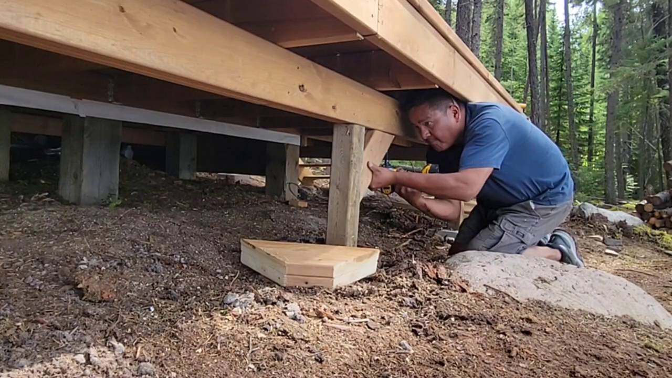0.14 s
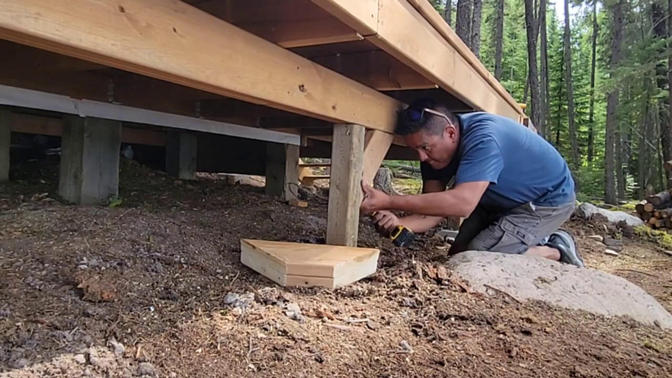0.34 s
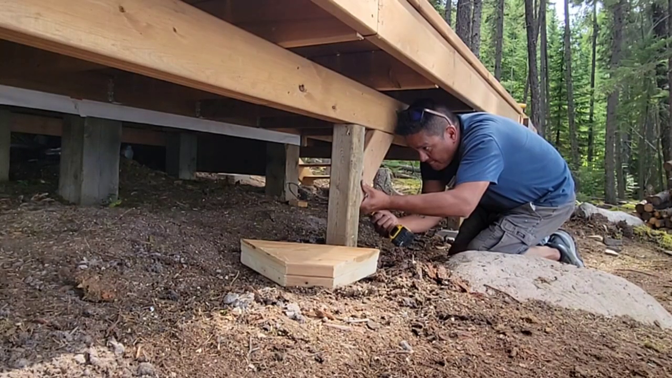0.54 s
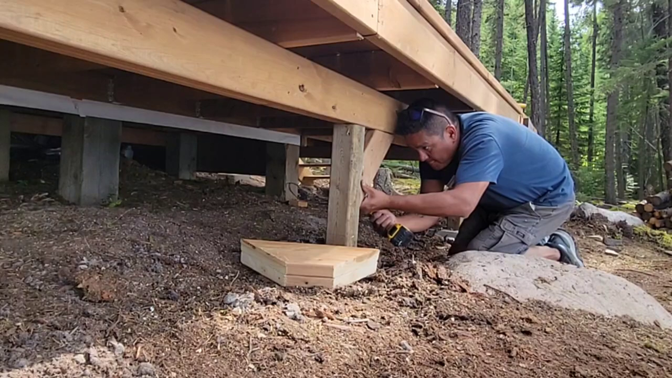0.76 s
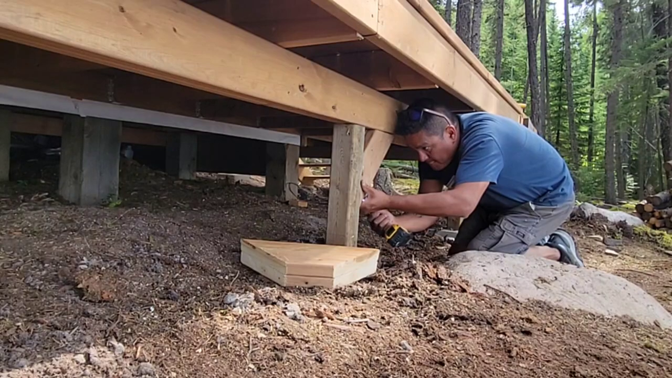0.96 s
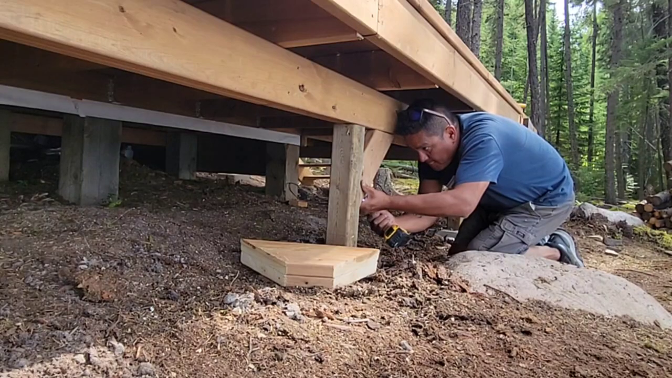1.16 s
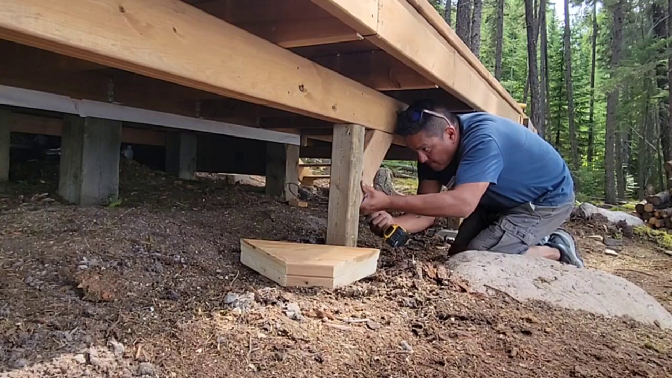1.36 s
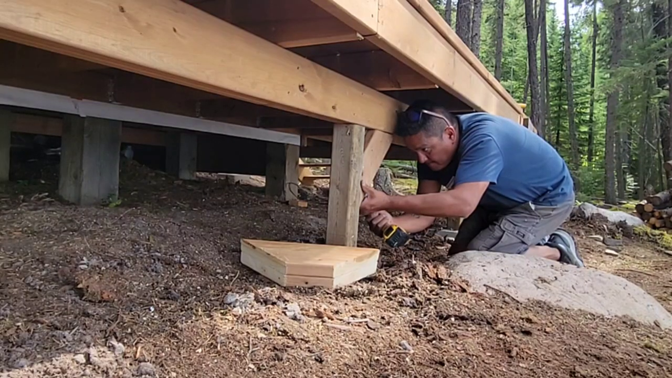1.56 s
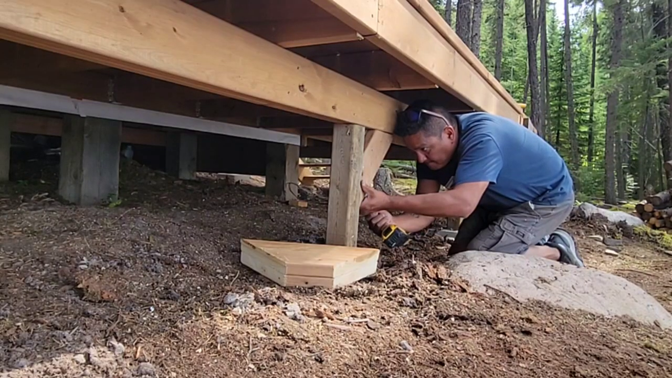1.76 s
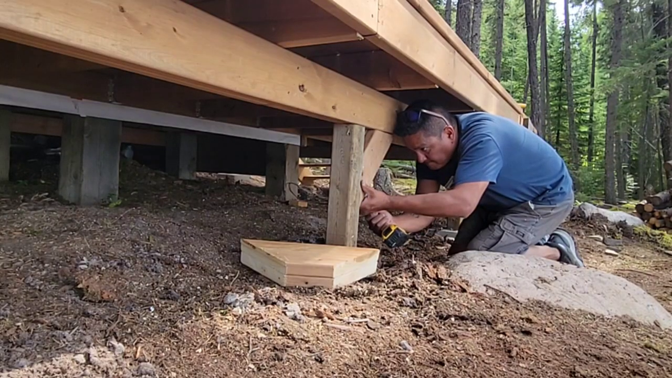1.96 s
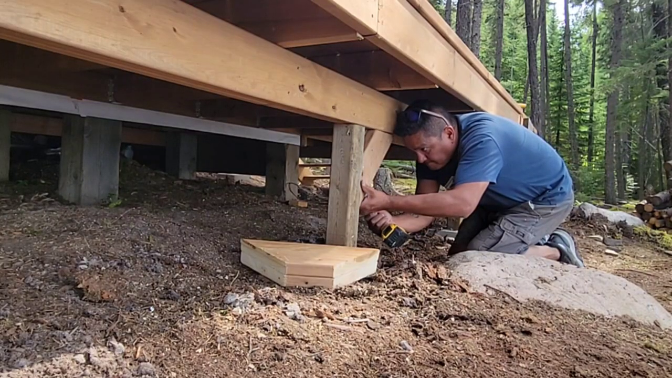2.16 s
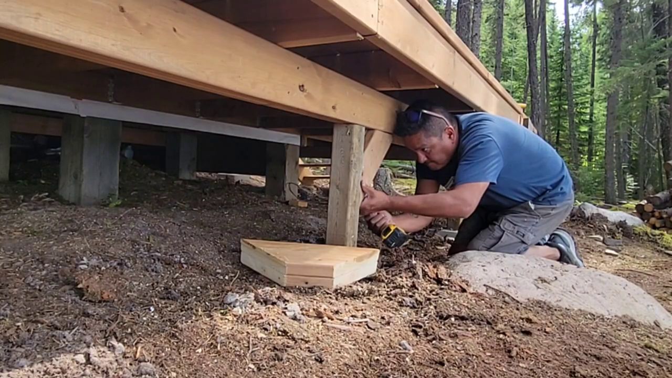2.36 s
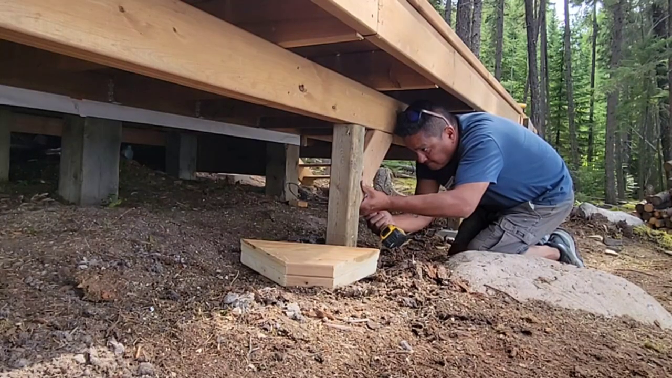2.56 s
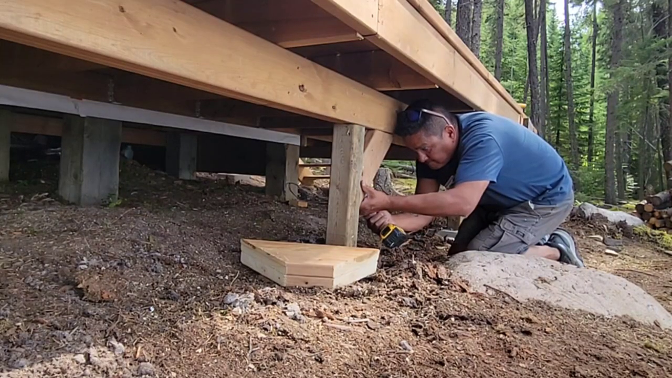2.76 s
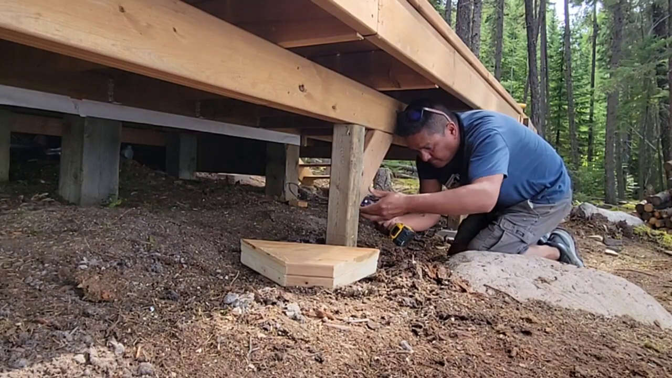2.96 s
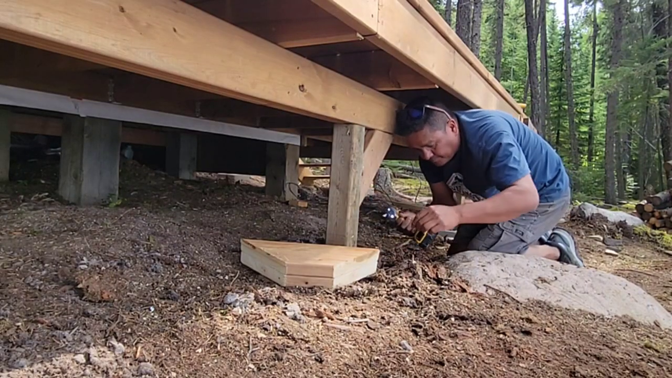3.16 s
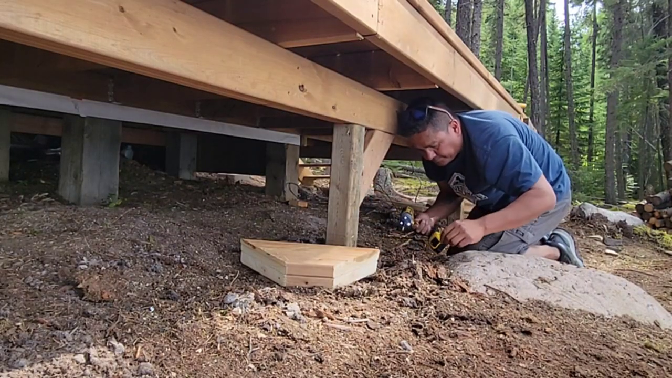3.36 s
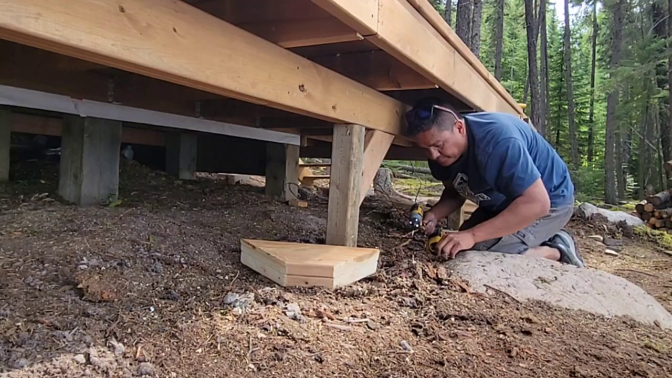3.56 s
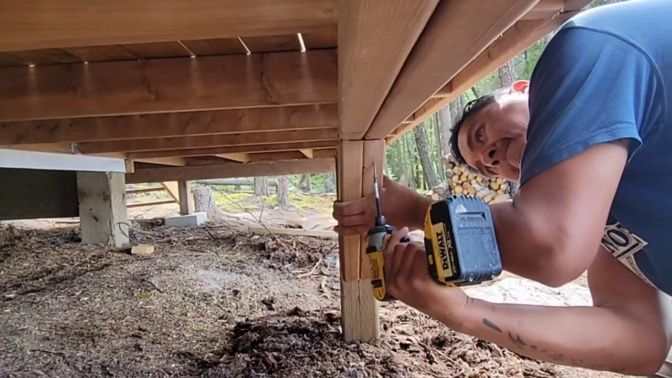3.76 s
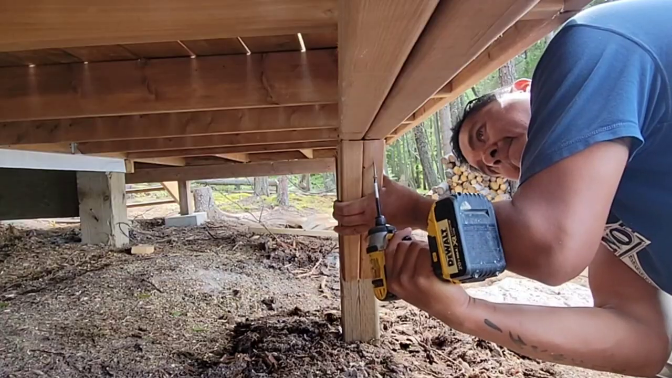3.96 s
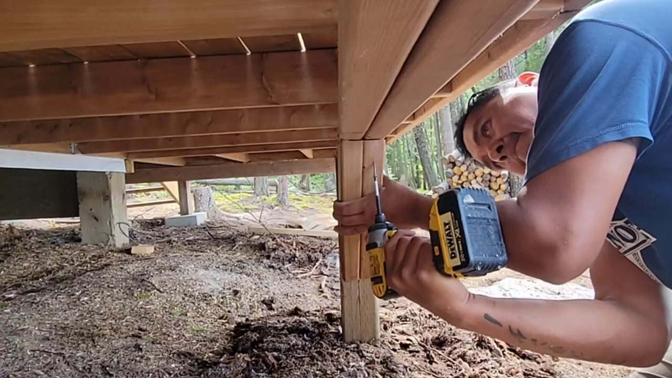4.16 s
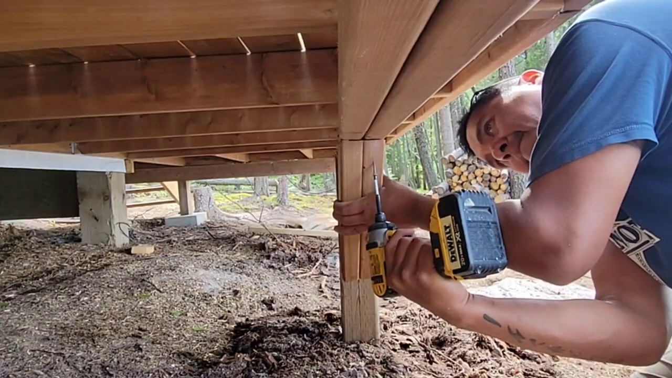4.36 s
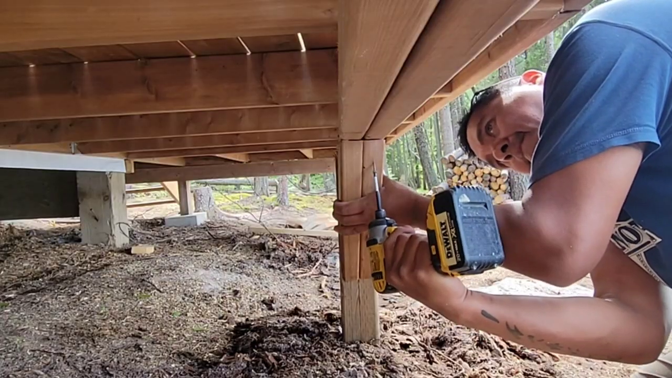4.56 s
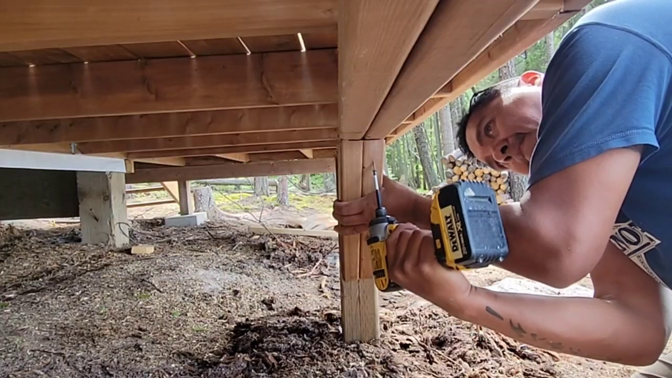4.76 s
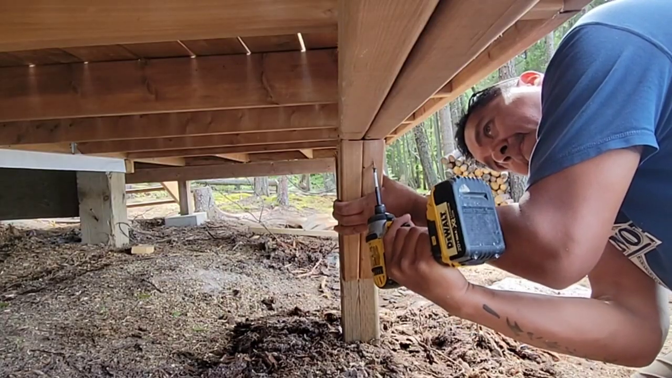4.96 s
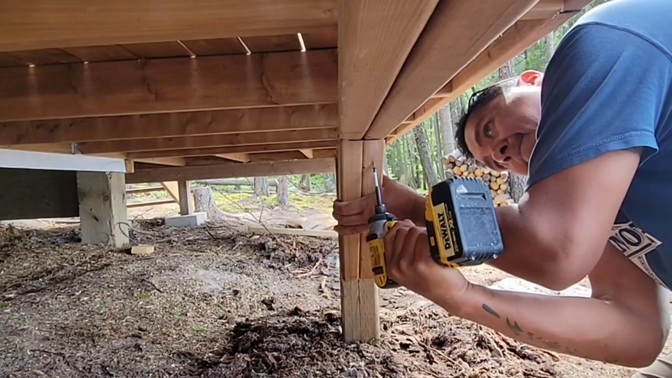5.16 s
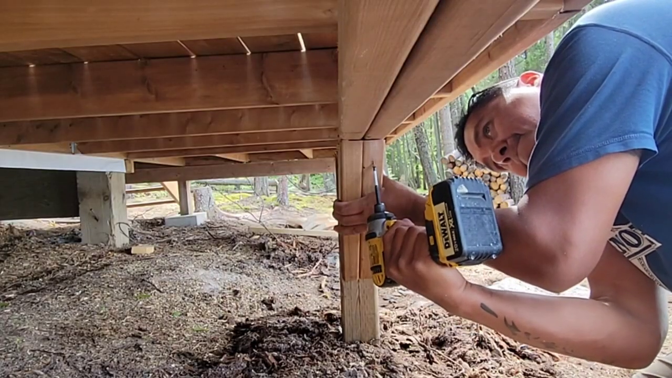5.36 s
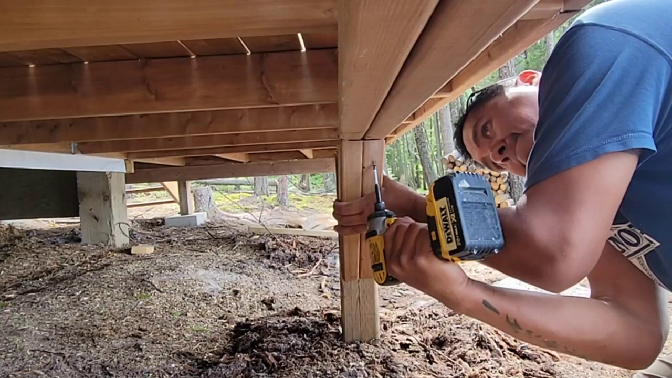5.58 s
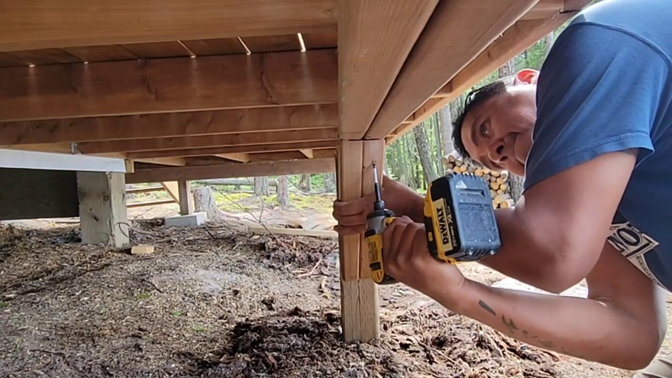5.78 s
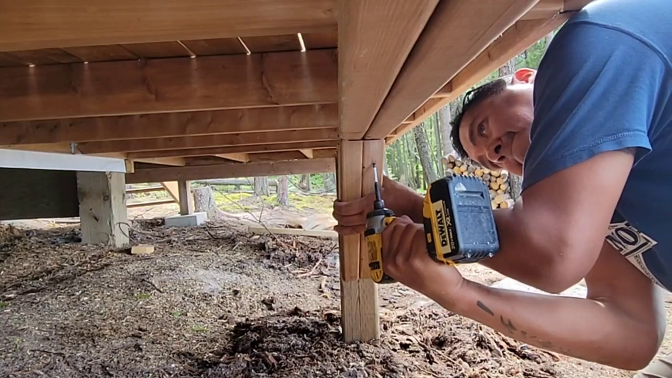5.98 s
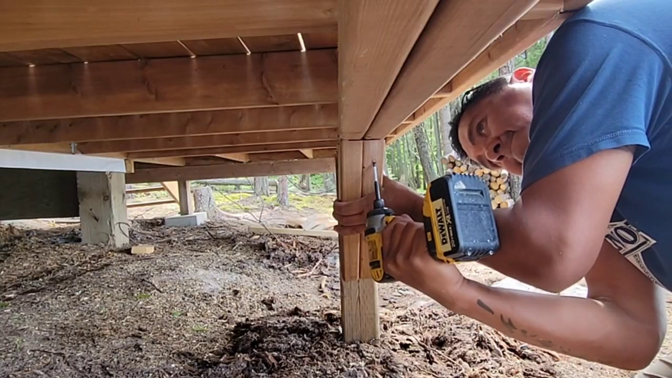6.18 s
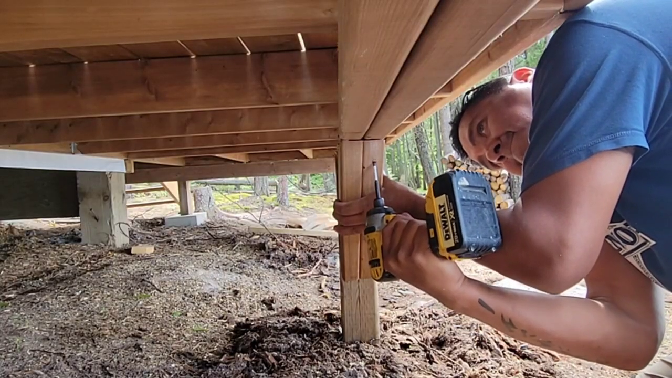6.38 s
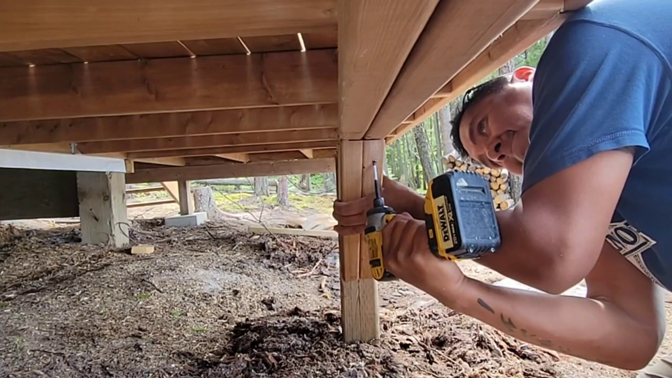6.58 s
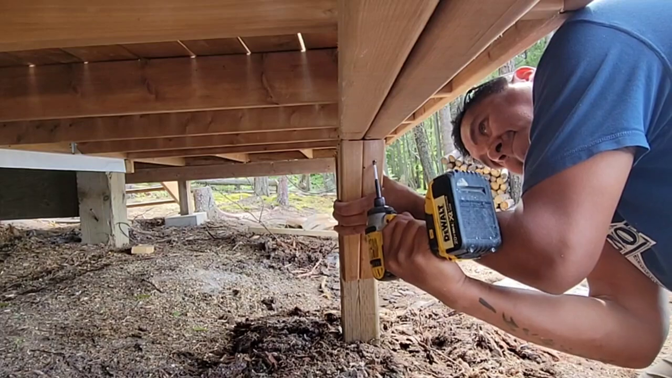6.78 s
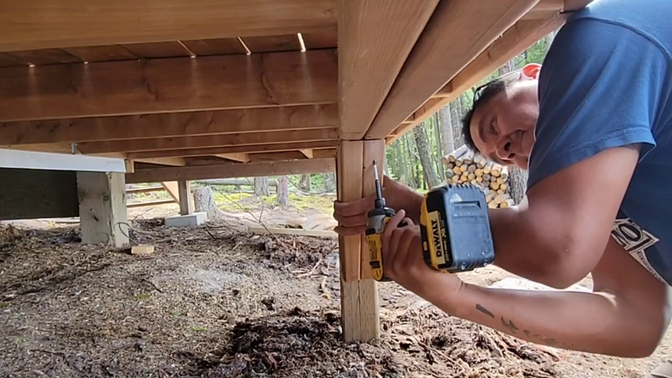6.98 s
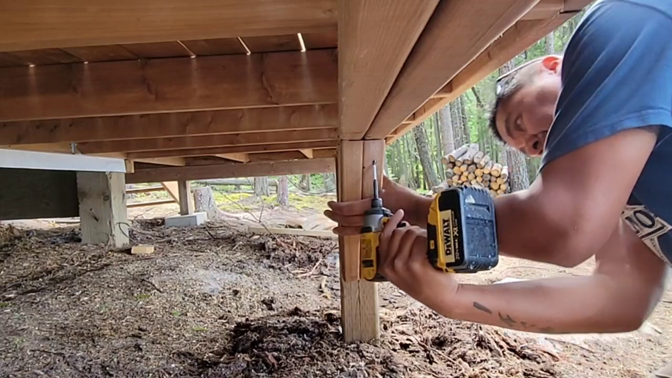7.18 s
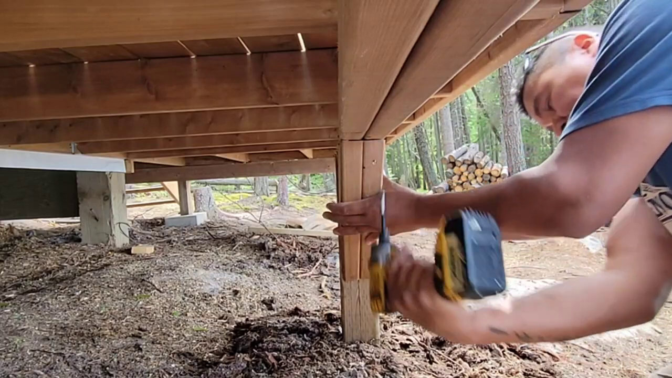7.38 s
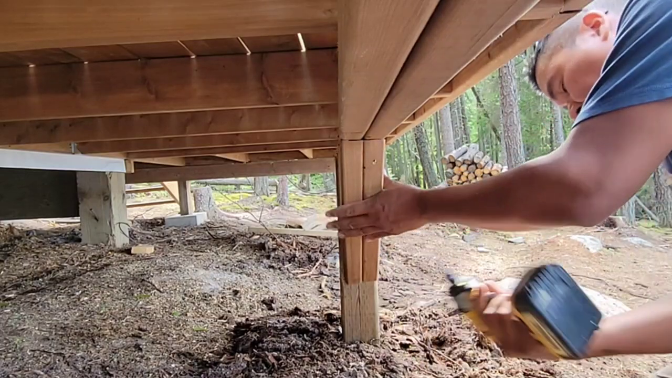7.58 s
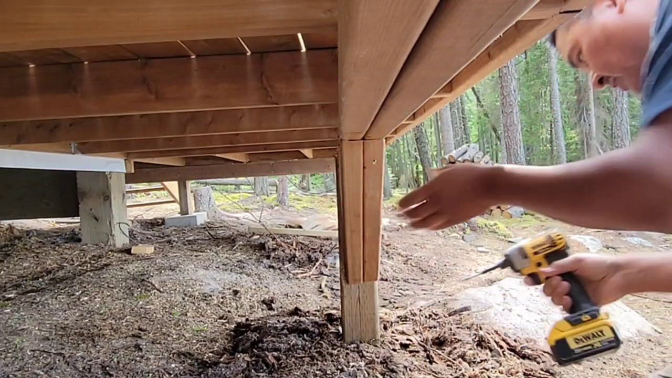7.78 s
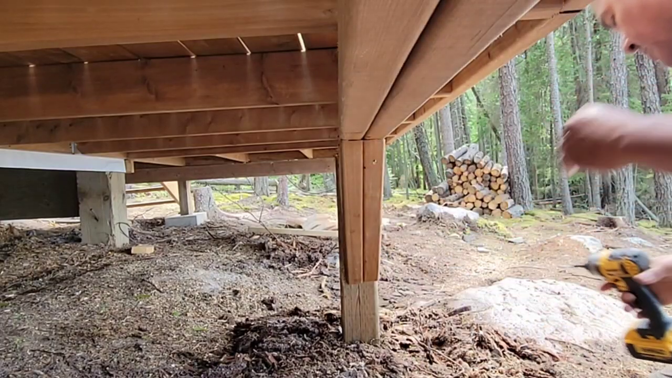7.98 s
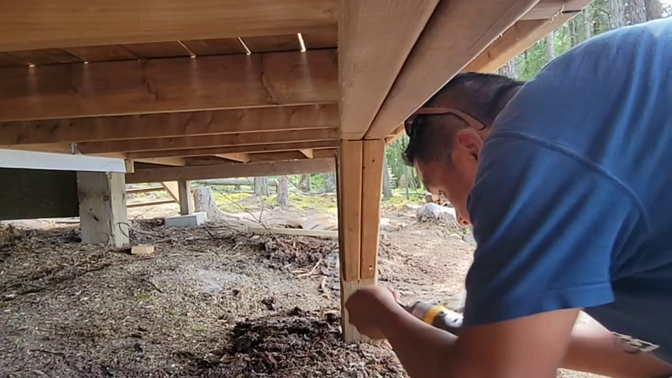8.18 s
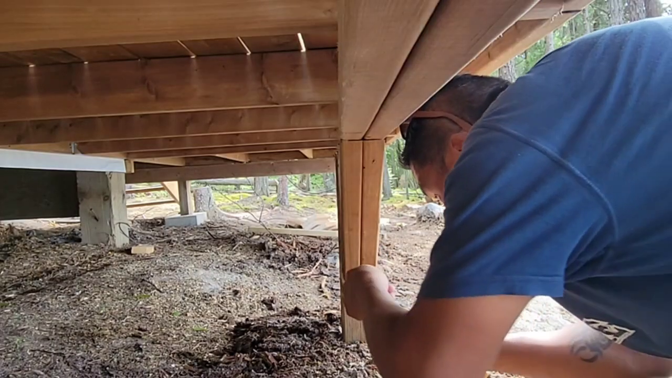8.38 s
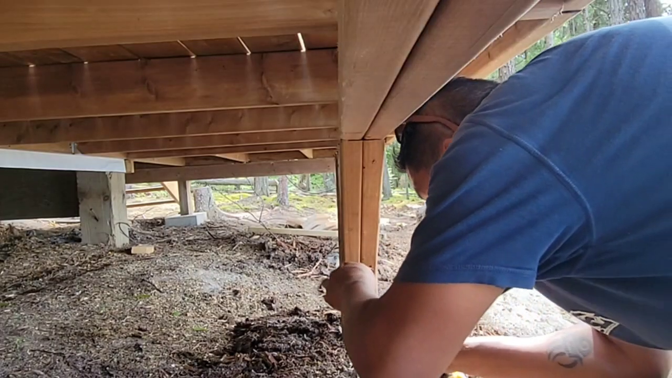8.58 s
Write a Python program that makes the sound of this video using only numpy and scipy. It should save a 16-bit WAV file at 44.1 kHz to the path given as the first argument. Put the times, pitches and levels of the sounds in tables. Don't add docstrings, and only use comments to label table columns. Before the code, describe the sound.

Outdoors beneath a wooden deck among trees, an impact driver bumps a post, spins up with a gear whine and a high screw squeal, then hammers rapidly for over a second and a half. Closer to the microphone come knocks, short trigger pulls and a second hammering burst that rings out in the timber. Soft shuffling on soil follows, over a faint distant generator drone.

```python
import sys
import numpy as np
from scipy import signal
from scipy.fft import rfft, irfft, next_fast_len
from scipy.io import wavfile
from scipy.ndimage import uniform_filter1d

SR = 44100
rng = np.random.default_rng(int(sys.argv[2]) if len(sys.argv) > 2 else 0)


def field_ratio(decibels):
    return 10 ** (np.asarray(decibels, dtype=float) / 20)


def to_wav(sig):
    pcm = np.clip(np.atleast_2d(sig), -1, 1) * 32767
    pcm = np.round(pcm).astype(np.int16)
    wavfile.write(sys.argv[1], SR, pcm.T)


N = 380583
T = np.arange(N) / SR

CHANGES_S = [
    3.665,
    8.03,
]

# time_s, blows_so_far
BLOW_COUNTS = [
    [(1.2626, 0), (2.1355, 34), (2.2606, 39), (2.358, 43), (2.793, 61), (2.8187, 62), (2.8522, 63),
     (2.8882, 64)],
    [(5.169, 0), (5.2058, 1), (5.327, 5), (5.4702, 10), (5.7629, 20), (6.043, 30), (6.4538, 45),
     (6.8549, 60), (6.885, 61)],
]
# time_s, effort_db, seated_0_to_1
EFFORT = [
    [(1.25, -5.5, 0), (1.264, 2.5, 0.06), (1.31, -1, 0), (2.17, -0.5, 0.1), (2.3, -2, 0.94), (2.79, 0, 0.7),
     (2.85, -5, .95), (2.9, -9, .95), (2.97, -13.5, .95)],
    [(5.14, -15, 0), (5.172, 0.5, 0.2), (5.23, 0, 0.11), (5.45, -1, 1), (6.15, -1.5, 0.9),
     (6.75, -1.5, 0.9), (6.83, 0, 0), (6.88, -10, 0.9), (6.99, -9.5, 0.8)],
]
# offset_ms, level_db, decay_ms
CONTACTS = [
    [(-6, -7.5, 2.2), (-0.79, -1.5, 3.2), (7, -9.5, 2), (14.5, -9, 3)],
    [(-8, -6.5, 6.4), (-3.5, -6, 0.85), (-2, -1.5, 4.4), (-1.5, -38, 3.7)],
]
# mode_hz, width_hz, level_db
BOOM_TIGHT = [
    [(152.5, 8.3, 0.5), (270, 46, -18), (394, 29, -4.5), (472.4, 26, -10.5), (550, 41, -6.5)],
    [(253.7, 14, 6), (310, 35, -18), (376.6, 21, -9.5), (460, 30, -1), (527, 18, -4), (569, 35, -26)],
]
# mode_hz, width_hz, level_db
BOOM_LOOSE = [
    [(157.5, 6.2, -1), (276, 42, -4.5), (395, 23, -7.5), (464, 31, -9.5), (554, 29, -7.5)],
    [(239.2, 7.7, 3.5), (312, 52, 0), (400, 41, -2), (500, 68, -3.5), (566, 20, -4.5)],
]
LOOSE_DB = [-0.5, -1]
# from_s, to_s
TIGHTENS_S = [(2.15, 2.3), (5.45, 5.9)]
# mode_hz, width_hz, level_db
KNOCK_FREE = [
    [(699, 24, -15.5), (819, 16, -3), (968.7, 16, 2), (1136, 18, 3.5), (1420, 40, -5), (1640, 260, 1.5)],
    [(773, 18.1, 2.5), (995, 41, 3), (1074, 19, 2.5), (1445, 36, 1), (2030, 90, -27)],
]
# mode_hz, width_hz, level_db
KNOCK_CLAMPED = [
    [(700, 12, -5), (886, 50, -3), (963, 75, 1), (1165, 80, 2), (1420, 35, -1), (1640, 240, 1.5)],
    [(748, 16, 2), (1010, 35, -2.5), (1083, 30, -1.5), (1457, 55, 5.5), (2020, 99, -28.5)],
]
# mode_hz, width_hz, level_db
JOIST = [
    [(207.3, 5.6, -4), (77.5, 39, -7)],
    [(111, 13, -6), (76.5, 49, -4.5), (147, 24, -4)],
]
# freq_hz, level_db_per_hz
RATTLE = [
    [(24, -71.5), (40, -37), (110, -17.5), (156, -8), (246, -10), (381, -7.5), (739, -15), (1140, -10),
     (1320, -13.5), (1460, -5.5), (2600, -30.5), (3380, -56), (5720, -120)],
    [(24, -61.5), (40, -33.5), (103, -15), (193, -14), (250, -10.5), (300, -7.5), (540, -10.5),
     (865, -23.5), (1070, -10), (1320, -26), (2600, -28), (3380, -63.5), (5720, -120)],
]
# freq_hz, level_db_per_hz
STEEL = [
    [(1060, -22), (1800, -8), (2400, -5.5), (3350, -2), (3680, -7), (4380, -9.5), (5530, -8.5), (6180, -10),
     (7300, -7.5), (9370, -13), (13300, -9.5), (16000, -21), (16500, -46.5)],
    [(1060, -37.5), (1800, -6.5), (1960, -5), (2360, -5), (3350, 1), (4150, -10), (5530, -6), (6780, -10),
     (7370, -5.5), (8950, -13.5), (13100, -9.5), (15800, -14), (16500, -50.5)],
]
# mode_hz, width_hz, level_db, seated_gain_db
ANVIL = [(5460, 1200, -34.5, 5.5), (7260, 527, -40, 1)]
# mode_hz, width_hz, level_db
SNAP = [
    [(1634, 400, 3), (2090, 51, -10.5), (2870, 340, -6), (5500, 1200, -2.5)],
    [(1880, 470, -3), (3080, 410, -2), (7430, 1500, 1), (11000, 4400, -3)],
]
SNAP_DB = [-25.5, -29]
# boom_db, knock_db, steel_db, joist_db
LAYER_DB = [(-18, -15.5, -23.5, -36), (-21.5, -25.5, -23.5, -27.5)]
# boom_db, knock_db, steel_db, joist_db
SEATED_DB = [(-0.5, -.7, 0.93, 10), (5.5, -0.87, 0.25, 3)]
DIE_DB_PER_S = [(161, 440, 880, 210), (170, 670, 700, 123)]
LAST_BLOWS_DB = [-3, -1]
RAP_SCATTER_DB = [1, 2.5]
RAP_SPREAD_S = [.005, .009]
DECK_SPREAD_S = [.003, .007]
PUSH_SPREAD_S = [.0067, .0067]
RATTLE_SPREAD_S = [.007, .012]

# time_s, mesh_hz, level_db, clear_tone_db
FREE_RUN = [(0.28, 460, -63, 2), (0.39, 740, -51, -6), (0.455, 984, -50, 3), (0.65, 1110, -45.5, 4.5),
            (0.722, 1349, -43, -3.5), (0.82, 1419, -43.5, -6), (0.94, 1325, -45, -6.5),
            (0.975, 1153, -39, 6), (1.07, 860, -64.5, -4.5)]
# start_s, let_go_s, coast_s, top_mesh_hz, level_db
PULLS = [
    (1.065, 1.25, 0.019, 1220, -43),
    (4.067, 4.155, 0.12, 995, -36.5),
    (4.381, 4.565, .095, 1111, -35),
    (4.746, 4.879, 0.082, 969, -35.5),
    (5.123, 5.17, 0.011, 1269, -37),
]
CLEAR_DB = [5, 4, -3, -15, 5]
DWELL_S = [0.025, .018, .028, 0.0012, 0.005]
# first_db, second_db
MESH_DB = [(5.6, 2), (1.1, 9.2)]
UPPER_DB = [0, 0, 0, -1, -2.5, 0]
# freq_hz, level_db_per_hz
WHIRR = [(24, -48), (40, -10.5), (79, -2), (172, -25), (228, -4), (865, -14.5), (1060, -4.5), (1290, -13.5),
         (2090, -13.5), (2430, -13.5), (3130, -11), (13200, -29), (15300, -30.5), (16500, -65)]
# mode_hz, width_hz, level_db
HOUSING = (3500, 130, 2.9)
# start_s, length_s, level_db
TRIGGER = [
    (1.065, .05, -59.5),
    (4.062, .05, -48),
    (4.393, .025, -49),
    (5.112, .02, -59),
]

# time_s, pitch_hz, first_db, overtones_db
SQUEAL = [
    [(.568, 4350, -46, -65), (.58, 4340, -37.5, -65), (.592, 4150, -37.5, -60), (.599, 3930, -26, -44),
     (.624, 3914, -17.5, -41), (.648, 3700, -25.5, -36), (.667, 3500, -32, -39)],
    [(.666, 3820, -21.5, -39.5), (.676, 3780, -16.5, -37.5), (.702, 3920, -21.5, -38),
     (.73, 3890, -17.5, -35), (.76, 3834, -17.5, -34.5), (.776, 3570, -22, -36), (.788, 3520, -29.5, -41)],
    [(.786, 3804, -25.5, -32), (.816, 3640, -25.5, -38), (.824, 3460, -26, -36.5), (.848, 3430, -25, -31.5),
     (.857, 3300, -28.5, -41), (.867, 3210, -26, -35), (.877, 3286, -31.5, -41)],
    [(.876, 3360, -25.5, -40), (.883, 3370, -21.5, -35.5), (.891, 3390, -29, -37), (.932, 3504, -17, -33.5),
     (.972, 3220, -21, -40), (.98, 3022, -26, -44.5), (.993, 2970, -22, -46), (1.006, 2900, -41, -58.5)],
    [(.998, 2320, -32, -58.5), (1.014, 1654, -21, -59), (1.024, 1446, -29.5, -62.5),
     (1.036, 1295, -50, -68)],
]

# start_s, thud_db, thud_hz, brightness_db
FAR_KNOCKS = [(0.002, -21.5, 212, -32), (0.013, -20.5, 200, -27), (0.041, -15, 930, -8),
              (0.057, -15.5, 255, -12.5), (0.081, -22, 756, -14), (0.105, -18, 260, -17.5),
              (0.03, -13.5, 700, -3.5), (0.07, -15, 219, -0.5), (0.096, -16.5, 247, -2.5),
              (0.115, -25, 256, -6.5), (0.204, -34.5, 220, -20.5), (0.271, -43, 122, -14),
              (1.125, -23, 295, -7), (1.139, -19.5, 394, -0.5), (1.187, -22, 144, -24)]
# start_s, thud_db, thud_hz, brightness_db
NEAR_KNOCKS = [(3.695, -41, 132, -7.5), (3.704, -28, 400, -6), (3.711, -17, 243, -26.5),
               (3.775, -25, 140, -17), (3.798, -37, 330, -12), (3.909, -45, 417, -19),
               (3.935, -38, 380, -14), (4.118, -11, 112, -31.5), (4.118, -6.5, 455, -20),
               (4.135, -17, 364, 3.5), (4.149, -15.5, 256, -15.5), (4.299, -26.5, 256, -11),
               (4.415, -24.5, 233, 4.5), (4.438, -21, 430, -13), (4.702, -13.5, 260, -26),
               (4.758, -27.5, 224, -14), (4.777, -15, 513, -1), (4.788, -20.5, 245, -13.5),
               (4.871, -11, 234, -13.5), (4.875, -9, 535, 0), (4.886, -9, 350, -7), (4.912, -12, 546, -8.5),
               (4.921, -8.5, 295, -4.5), (4.931, -12.5, 500, -20.5), (5.056, -29, 132, -13),
               (5.116, -31, 116, -5.5), (5.129, -20.5, 255, 0), (5.156, -12, 400, -7),
               (5.159, -22, 196, -11)]
# start_s, thud_db, brightness_db
SHUFFLES = [(7.299, -36.5, -12.5), (7.319, -39, -21), (7.343, -52, -6.5), (7.37, -43.5, -8.5),
            (7.384, -49, -16.5), (7.487, -50, -18.5), (7.6, -51, -21), (7.679, -57, -17.5),
            (7.779, -65, -14), (8.034, -43.5, -14.5), (8.093, -54.5, -5), (8.191, -53.5, -9.5)]
# hollow_over_click_db, t60_s, hollow_hz
KNOCK_KINDS = [(16, 0.1, 800), (8.5, 0.06, 1400), (17, 0.072, 990)]
# start_s, length_s, level_db, centre_hz
RUSTLES = [(1.129, 0.028, -19.5, 1230), (7.291, .03, -63, 11000), (8.026, 0.032, -67, 9050),
           (3.683, 0.13, -73, 2210), (3.895, .06, -74, 2200), (4.669, 0.033, -40.5, 1460),
           (4.952, 0.14, -41, 400), (5.017, 0.05, -52, 2200), (4.688, 0.011, -46.5, 5000),
           (7.229, 0.11, -63, 477), (7.288, .14, -74.5, 2164), (7.595, 0.067, -69, 420),
           (7.619, .22, -80.5, 3250), (8.071, 0.2, -73.5, 2510), (8.361, .08, -76, 700)]
# mode_hz, width_hz, level_db, t60_s
RING_OUT = [
    (110, 43, -31.5, 0.55),
    (255, 50, -28.5, .28),
    (450, 220, -38, 0.18),
    (1050, 500, -45.5, 0.16),
]

# multiple, level_db
GENERATOR = [
    [(1, -25.5), (2, -18.5), (3, -4), (4, 0), (5, -6), (6, 1.5), (7, -24), (8, -30.5), (9, -22.5),
     (10, -26)],
    [(1, -4.5), (2, 3), (3, -4.5), (4, 1.5), (5, -9.5), (6, -9.5), (7, -5.5), (8, -11), (9, -23.5),
     (10, -18)],
    [(1, -10), (2, 1), (3, -4.5), (4, 0.5), (5, -9), (6, -17.5), (7, -8), (8, -28), (9, -43), (10, -22.5)],
]
GENERATOR_DB = [-47, -47, -45]
# freq_hz, level_db_per_hz
FOREST = [(15, -37), (25, 0), (65, -15), (118, -7), (202, -10), (399, -29), (600, -31), (687, -43),
          (902, -31), (1010, -35.5), (2900, -37), (5720, -50.5), (7920, -47), (15200, -61.5), (16500, -77)]
FOREST_DB = [-49.5, -55, -56.5]
# freq_hz, side_minus_mid_db
WIDTH = [(60, -18), (110, -14.5), (200, -13), (380, -11.5), (700, -6.5), (1290, -6), (2380, -4), (4400, -1),
         (8120, -1), (15000, 0.5)]


def unit(x):
    return x / np.sqrt(np.mean(x ** 2) + 1e-30)


def colour(x, points):
    size = next_fast_len(len(x))
    hz, db = np.transpose(points)
    bins_hz = np.arange(size // 2 + 1) * SR / size
    gain = field_ratio(np.interp(np.log(bins_hz + 1), np.log(hz), db))
    return irfft(rfft(x, size) * gain, size)[:len(x)]


def butter(x, edge_hz, kind="low"):
    return signal.sosfilt(signal.butter(2, edge_hz, kind, fs=SR, output="sos"), x)


def ring(x, hz, width_hz):
    return signal.lfilter(*signal.iirpeak(hz, hz / width_hz, SR), x)


def modes(drive, table, flip=-1):
    return unit(sum(flip ** j * field_ratio(db) * ring(drive, hz, width_hz) / np.sqrt(width_hz)
                    for j, (hz, width_hz, db) in enumerate(table)))


def decay(hits, decay_ms):
    return signal.lfilter([1], [1, -np.exp(-1000 / (decay_ms * SR))], hits)


def walk(rate_hz, size):
    k = int(SR / rate_hz)
    return unit(uniform_filter1d(uniform_filter1d(rng.standard_normal(size), k), k))


def smear(size, decay_s):
    paths = rfft(rng.standard_normal(4000) * np.exp(-T[:4000] / decay_s), size)
    return paths / np.abs(paths)


def scatter(x, decay_s):
    return irfft(rfft(x) * smear(len(x), decay_s), len(x))


def span(table):
    s, *columns = np.transpose(table)
    at = slice(int(s[0] * SR), int(s[-1] * SR))
    return at, [np.interp(T[at], s, c) for c in columns]


def effort(k):
    at, (effort_db, seated) = span(EFFORT[k])
    after_s = np.maximum(T[at] - BLOW_COUNTS[k][-1][0], 0)
    levels_db = [db + effort_db + more_db * seated - die * after_s
                 for db, more_db, die in zip(LAYER_DB[k], SEATED_DB[k], DIE_DB_PER_S[k])]
    return at, np.clip(seated, 0, 1), levels_db


def strikes(k, start, size):
    s, struck = np.transpose(BLOW_COUNTS[k])
    chance = rng.standard_normal((int(struck[-1]) + 1, 2 * len(CONTACTS[k]) + 2))
    slack_s, blow_scatter_db = .00015, 2.6
    times_s = np.interp(np.arange(struck[-1] + 1), struck, s) + slack_s * chance[:, -1]
    weak_db = LAST_BLOWS_DB[k] * np.maximum(np.arange(len(times_s)) - len(times_s) + 4, 0)

    def place(at_s):
        return np.clip((at_s * SR).astype(int) - start, 0, size - 1)

    pushes, raps, cracks, snaps = np.zeros((4, size))
    for j, (ms, db, decay_ms) in enumerate(CONTACTS[k]):
        steady_s = times_s + ms / 1000
        jitter_s, strength = 0.00073 * chance[:, 2 * j], chance[:, 2 * j + 1]
        hit = np.zeros(size)
        hit[place(steady_s + jitter_s)] = field_ratio(db + weak_db + blow_scatter_db * strength)
        raps[place(steady_s)] = field_ratio(2 * db + weak_db + RAP_SCATTER_DB[k] * strength)
        cracks += uniform_filter1d(decay(hit, decay_ms), size=50)
        snaps += (-1) ** j * hit ** 1.5
        if j == 0:
            lift = decay(hit, 3.5)
    pushes[place(times_s)] = field_ratio(1.4 * chance[:, -2] + weak_db)
    return pushes, raps, cracks, snaps, lift


def timber(k, at, seated, pushes, raps):
    pushes = scatter(pushes, PUSH_SPREAD_S[k])
    raps = scatter(raps, RAP_SPREAD_S[k])
    tight = np.interp(T[at], TIGHTENS_S[k], [0, 1])
    boom = tight * modes(pushes, BOOM_TIGHT[k])
    boom += (1 - tight) * modes(pushes, BOOM_LOOSE[k]) * field_ratio(LOOSE_DB[k])
    knock = (1 - seated) * modes(raps, KNOCK_FREE[k]) + seated * modes(raps, KNOCK_CLAMPED[k])
    knock *= field_ratio(1.1 * walk(27, len(raps)))
    return boom, knock, modes(pushes, JOIST[k])


def steel_crack(k, cracks):
    size, split_hz = len(cracks), 6500
    dull = butter(unit(rng.standard_normal(size) * cracks), split_hz)
    bright = butter(unit(rng.standard_normal(size) * cracks ** 1.9), split_hz, "high")
    return unit(colour(dull + bright, STEEL[k]))


def anvil_ring(k, seated, lift):
    hz, width_hz, db, more_db = ANVIL[k]
    noise = rng.standard_normal(len(lift)) * lift
    return unit(ring(ring(noise, hz, width_hz), hz, width_hz)) * field_ratio(db + more_db * seated)


def boards(k, pushes, cracks, deck_db, loose_db):
    deck = colour(scatter(pushes, DECK_SPREAD_S[k]), RATTLE[k])
    blurred = uniform_filter1d(cracks, int(RATTLE_SPREAD_S[k] * SR))
    rattle = colour(rng.standard_normal(len(cracks)) * blurred, RATTLE[k])
    return unit(deck) * field_ratio(deck_db) + unit(rattle) * field_ratio(loose_db)


def hammer(k, bed_db, deck_db, loose_db):
    at, seated, (boom_db, knock_db, steel_db, joist_db) = effort(k)
    pushes, raps, cracks, snaps, lift = strikes(k, at.start, len(seated))
    cracks = cracks + field_ratio(bed_db)
    boom, knock, joist = timber(k, at, seated, pushes, raps)
    bare_db = steel_db - LAYER_DB[k][2]
    out = np.zeros(N)
    out[at] = boom * field_ratio(boom_db) + knock * field_ratio(knock_db - 1.5) + joist * field_ratio(joist_db)
    out[at] += steel_crack(k, cracks) * field_ratio(steel_db)
    out[at] += anvil_ring(k, seated, lift) * field_ratio(bare_db)
    out[at] += modes(snaps, SNAP[k], flip=1) * field_ratio(SNAP_DB[k] + bare_db)
    out[at] += boards(k, pushes, cracks, deck_db, loose_db) * field_ratio(knock_db)
    return out


def pull(start_s, let_go_s, coast_s, top_hz, db, clear_db, dwell_s):
    start_hz, spin_up_s, coast_loss, db_per_octave, edge_s = 344, .05, 0.79, 10.5, 0.022
    end_s = let_go_s + coast_s
    at = slice(int(start_s * SR), int(end_s * SR))
    t = T[at]
    driven_s = np.maximum(np.minimum(t, let_go_s) - start_s - dwell_s, 0)
    hz = top_hz - (top_hz - start_hz) * np.exp(-driven_s / spin_up_s)
    coasted = np.maximum(t - let_go_s, 0) / coast_s
    hz = hz * (1 - coast_loss * min(coast_s / 0.072, 1) * coasted ** 1.7)
    edge = np.clip(np.minimum(t - start_s, end_s - t) / edge_s, 0, 1)
    return at, (hz, db + db_per_octave * np.log2(hz / hz.max()) - 30 * (1 - edge) ** 2, clear_db)


def gear_whine(hz, noise_db, clear_db, upper_db, near):
    size = len(hz)
    first_db, second_db = (noise_db + db for db in MESH_DB[int(near)])
    first_db = first_db.max() + 0.7 * (first_db - first_db.max())
    waver = .021 * (.45 if near else 1)
    phase = 2 * np.pi * np.cumsum(hz * (1 + waver * walk(250, size))) / SR
    turn = 1 + 0.22 * np.sin(phase / 16)
    whine = field_ratio(first_db + clear_db + 5.8 * walk(59, size)) * turn * np.sin(phase)
    uneven = phase + 1.8 * np.sin(phase / 8) + 0.6 * walk(300, size)
    whine += field_ratio(first_db - 4.5 - .5 * clear_db + 3 * walk(90, size)) * np.sin(uneven)
    for multiple, db in ((2, 0), (3, -4), (4, -7 if near else -12)):
        level = field_ratio(second_db + upper_db + db + 4.5 * walk(70, size))
        whine += level * np.sin(multiple * phase + .45 * walk(400, size))
    return whine * np.clip(hz / min(.78 * hz.max(), 850), 0, 1) ** 5


def fan_whirr(noise_db, near):
    whirr = unit(colour(rng.standard_normal(len(noise_db)), WHIRR))
    if near:
        hz, width_hz, db = HOUSING
        whirr = whirr + field_ratio(db) * ring(whirr, hz, width_hz)
    else:
        whirr = butter(whirr, 350, "high")
    return whirr * field_ratio(noise_db + 11 + 2.5 * walk(120, len(noise_db)))


def motor():
    out = np.zeros(N)
    loaded_run, loaded_db, stall_s, trigger_hz = 2, -6, 4.885, 3920
    runs = [span(FREE_RUN)] + [pull(*row, db, dwell_s) for row, db, dwell_s in zip(PULLS, CLEAR_DB, DWELL_S)]
    for run, ((at, (hz, noise_db, clear_db)), upper_db) in enumerate(zip(runs, UPPER_DB)):
        near = at.start > CHANGES_S[0] * SR
        whine = gear_whine(hz, noise_db, clear_db, upper_db, near)
        if run == loaded_run:
            whine *= field_ratio(loaded_db)
        whine *= np.where((at.start < stall_s * SR) & (T[at] > stall_s), .2, 1)
        whirr = fan_whirr(noise_db, near)
        out[at] = (np.sqrt(2) * whine + whirr) * signal.windows.tukey(len(hz), .1)
    for s, length_s, db in TRIGGER:
        out += field_ratio(db) * ((T > s) & (T < s + length_s)) * np.sin(2 * np.pi * trigger_hz * T)
    return out


def squeal():
    out = np.zeros(N)
    waver, throb_db, fray, third_db = .008, 2.3, 1.05, -1.5
    for slip in SQUEAL:
        at, (hz, first_db, second_db) = span(slip)
        size = len(hz)
        phase = 2 * np.pi * np.cumsum(hz * (1 + waver * (walk(73, size) + walk(500, size)))) / SR
        levels_db = (first_db, second_db, second_db + third_db - 4, second_db + third_db - 10.5)
        tone = np.zeros(size)
        for j, db in enumerate(levels_db):
            level = field_ratio(db + (throb_db + j) * walk(170, size))
            tone += level * np.sin((j + 1) * phase + fray * j * walk(700, size))
        biting = (T[at] > .78) & (T[at] < .93)
        tone += field_ratio(first_db - 5.0 + 6.6 * walk(60, size)) * biting * np.sin(0.97 * phase)
        out[at] += np.sqrt(2) * tone * signal.windows.tukey(size, .06)
    return out


def knock(thud_db, hz, bright_db, hollow_db, t60_s, hollow_hz):
    t = T[:8000]
    post_hz, post_share = 94.3, .35
    click_db = thud_db + bright_db
    knock_db = click_db + hollow_db
    noise = rng.standard_normal((3, len(t)))
    fade = np.exp(-np.log(1000) * t / max(t60_s, .01))
    rise = 1 - np.exp(-t / 0.0017)
    base_hz = min(hz, 300)
    thump = ring(noise[2], min(hz, 360), 0.72 * base_hz)
    thump = unit(ring(thump, min(0.9 * hz, 340), 1.29 * base_hz))
    thud = 0.85 * np.sin(2 * np.pi * hz * t) + 0.56 * thump
    thud += post_share * np.sin(2 * np.pi * post_hz * t)
    thud *= 1 - np.exp(-t / 0.0055)
    hollow = unit(ring(noise[0], hollow_hz, 0.64 * hollow_hz)) * fade
    click = unit(colour(noise[1], STEEL[1])) * (fade ** 1.9 + 0.16 * fade)
    if click_db < -30:
        click = 1.7 * ring(click, 3000, 3500)
    sharp = field_ratio(knock_db - 10.0) * hollow + field_ratio(click_db + 1.0) * click
    return field_ratio(thud_db + 7.0) * thud * fade + rise * sharp


def knocks():
    out = np.zeros(N)
    soil_hz = 108
    shuffles = [(s, db, soil_hz, bright_db) for s, db, bright_db in SHUFFLES]
    for rows, kind in zip((FAR_KNOCKS, NEAR_KNOCKS, shuffles), KNOCK_KINDS):
        for s, *how in rows:
            x = knock(*how, *kind)
            i = max(int((s - .002) * SR), 0)
            out[i:i + len(x)] += x
    return out


def rustles():
    out = np.zeros(N)
    grain_db = 5
    for s, length_s, db, hz in RUSTLES:
        size = int(length_s * SR)
        grains = rng.standard_normal(size) * field_ratio(grain_db * walk(153, size))
        grains *= signal.windows.tukey(size, .5)
        shower = ring(ring(grains, hz, 1.3 * hz), 0.8 * hz, 1.5 * hz)
        out[int(s * SR):][:size] += unit(shower) * field_ratio(db)
    return out


def ring_out():
    t = np.maximum(T - 6.86, 0)
    out = np.zeros(N)
    for hz, width_hz, db, t60_s in RING_OUT:
        mode = unit(ring(ring(rng.standard_normal(N), hz, width_hz), hz, width_hz))
        out += mode * field_ratio(db - 60 * t / t60_s)
    return out * np.clip(t / 0.026, 0, 1)


def background():
    generator_hz, panel_hz = 30.95, 940
    phase = 2 * np.pi * np.cumsum(generator_hz * (1 + 0.0024 * walk(1.0, N))) / SR
    view = np.searchsorted(CHANGES_S, T)
    start = 2 * np.pi * rng.random(12)
    out = np.zeros(N)
    for k, orders in enumerate(GENERATOR):
        drone = sum(field_ratio(db + 1.3 * walk(15, N)) * np.sin(m * phase + start[j])
                    for j, (m, db) in enumerate(orders))
        out += (view == k) * unit(drone) * field_ratio(GENERATOR_DB[k])
    firing = (1 + .4 * walk(40, N)) * (1 + np.cos(phase)) ** 2
    buzz = unit(firing * np.sin(2 * np.pi * panel_hz * T + 1.5 * walk(30, N)))
    buzz *= field_ratio(np.array([-75, -86, -84])[view])
    trees = unit(colour(rng.standard_normal(N), FOREST))
    trees *= field_ratio(np.array(FOREST_DB)[view] + .6 * walk(3.7, N))
    gain = 1 - 0.85 * (T > 5.2) * np.exp(-np.maximum(T - 7, 0) ** 2 / 0.68)
    return out + gain * (buzz + trees)


def echo(x):
    t = T[:SR // 2]
    tail = rng.standard_normal(len(t)) * np.exp(-np.log(1000) * t / 0.1)
    wet = signal.fftconvolve(x, tail / np.sqrt(np.sum(tail ** 2)))[:N]
    return field_ratio(-10.5) * np.roll(wet, 500)


def two_ports(mid):
    size = next_fast_len(N + SR)
    loose = np.clip(np.arange(size // 2 + 1) * SR / size / 1700, .5, 1)
    late = irfft(rfft(mid, size) * -1j * np.sqrt(1 - loose ** 2), size)
    scattered = signal.hilbert(irfft(rfft(mid, size) * loose * smear(size, 0.0025), size))
    drift = np.exp(1.1j * walk(40, size))
    side = colour((late + np.real(scattered * drift))[:N], WIDTH)
    side -= .12 * (T > CHANGES_S[0]) * (T < 7) * ring(mid, 7000, 9000)
    return np.array([mid + side, mid - side]) * field_ratio([[-.3], [.3]])


def scene():
    near = hammer(0, bed_db=-13.5, deck_db=-5.5, loose_db=-9.5)
    near += hammer(1, bed_db=-14, deck_db=0.36, loose_db=4.0)
    near += motor() + squeal() + knocks() + rustles() + ring_out()
    near = butter(near, 45, "high")
    return two_ports(near + echo(near) + background())


def band_limit(x):
    return signal.sosfilt(signal.butter(12, 16990, fs=SR, output="sos"), x)


def record(dry):
    limited = .92 * np.tanh(dry / .92)
    top_cut = signal.ellip(8, .2, 60, 16100, fs=SR, output="sos")
    mix = signal.sosfilt(top_cut, limited)
    return band_limit(mix)


dry = scene()
out = record(dry)
to_wav(out)
```